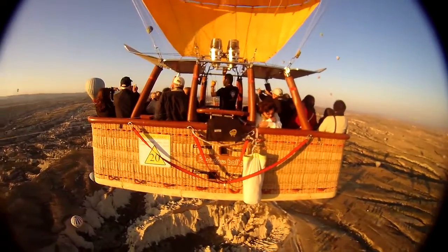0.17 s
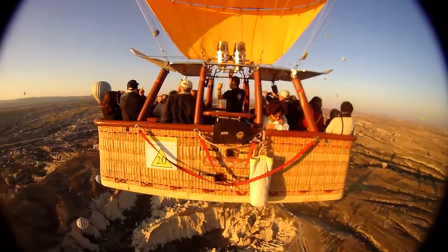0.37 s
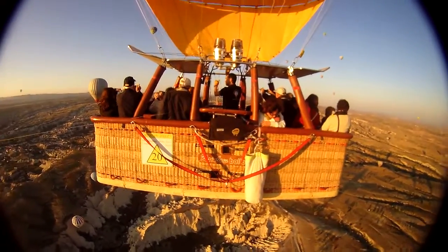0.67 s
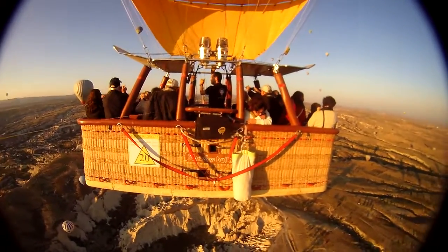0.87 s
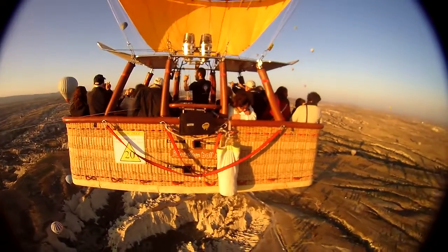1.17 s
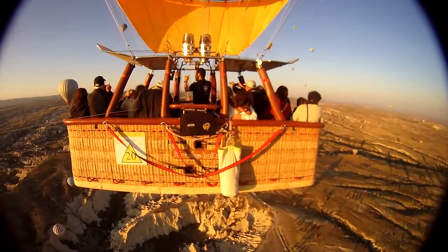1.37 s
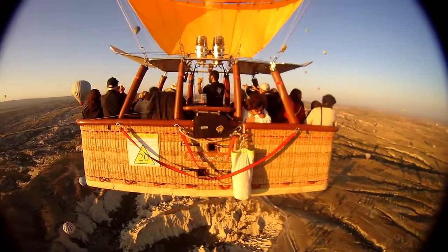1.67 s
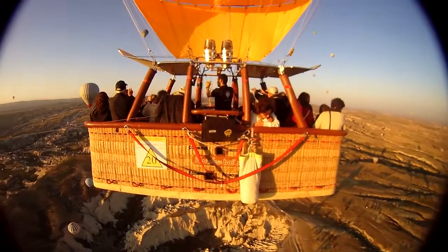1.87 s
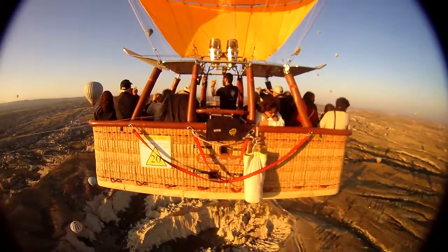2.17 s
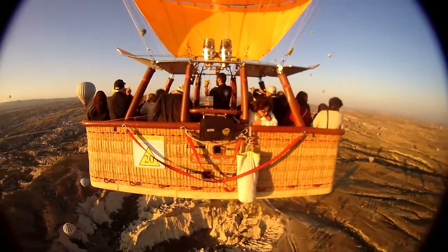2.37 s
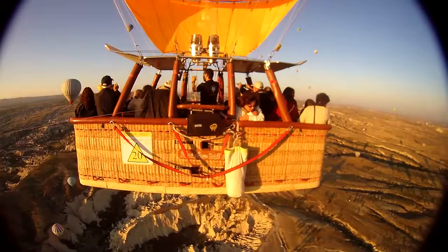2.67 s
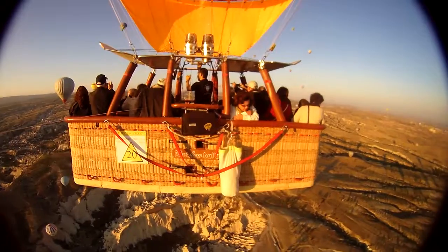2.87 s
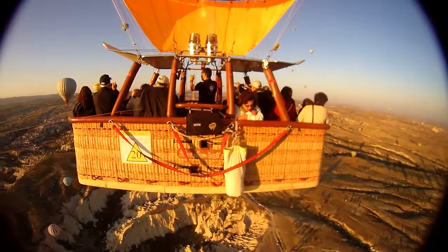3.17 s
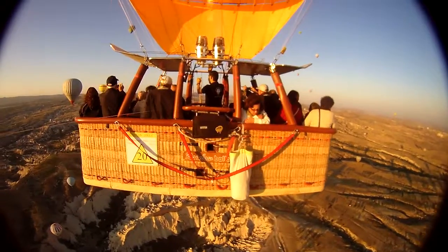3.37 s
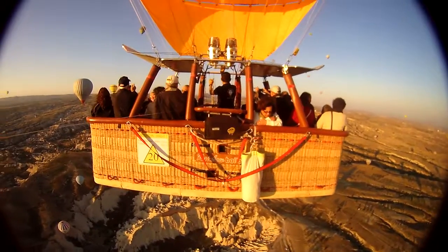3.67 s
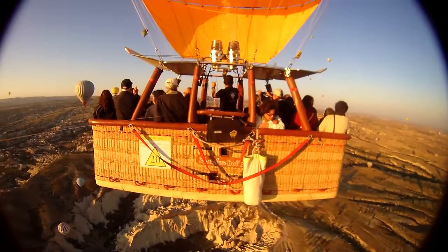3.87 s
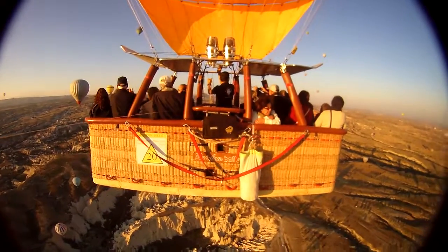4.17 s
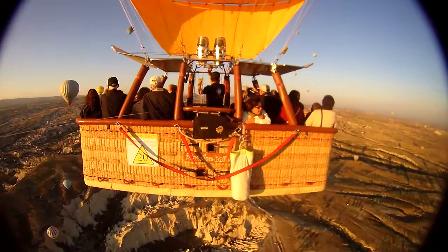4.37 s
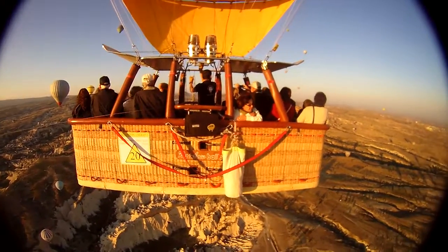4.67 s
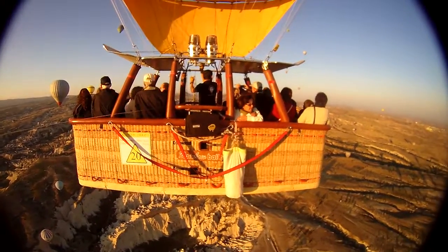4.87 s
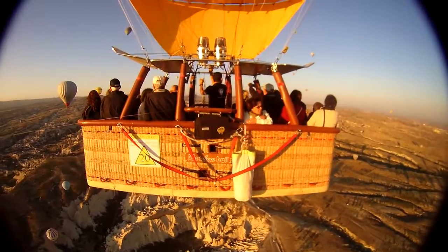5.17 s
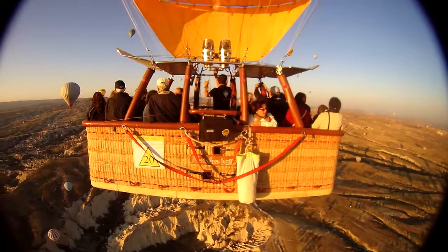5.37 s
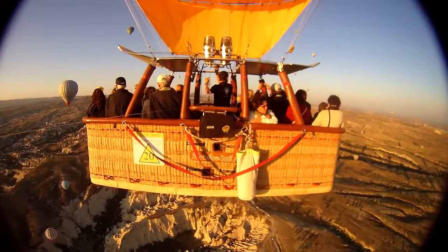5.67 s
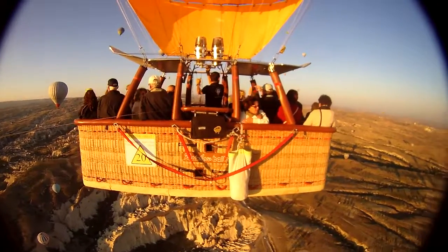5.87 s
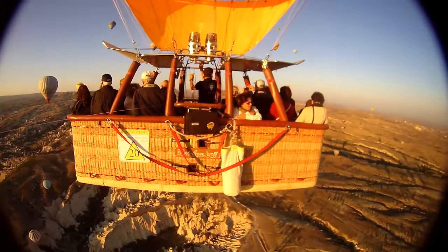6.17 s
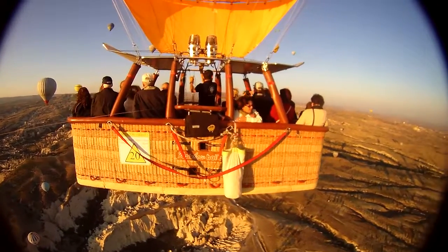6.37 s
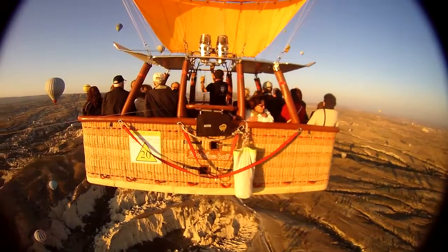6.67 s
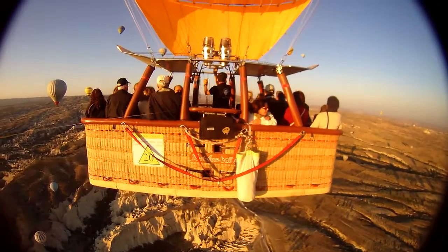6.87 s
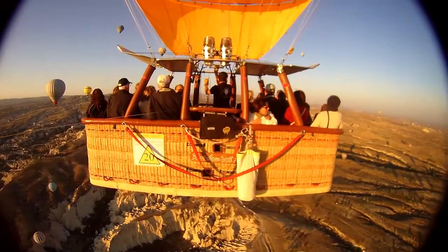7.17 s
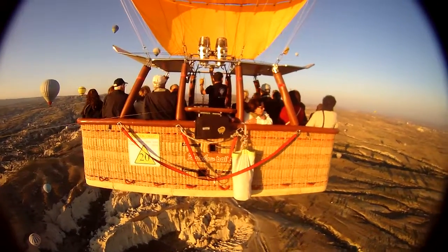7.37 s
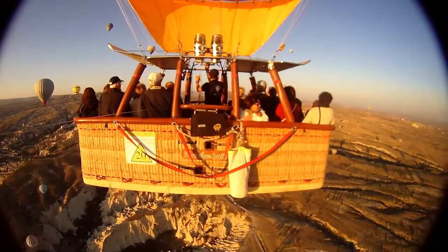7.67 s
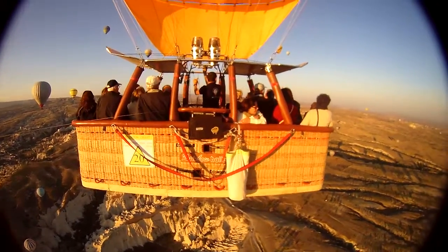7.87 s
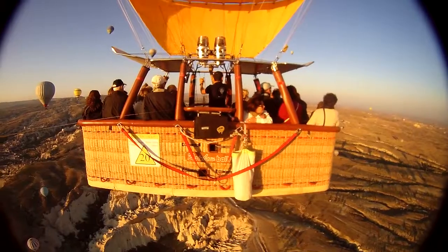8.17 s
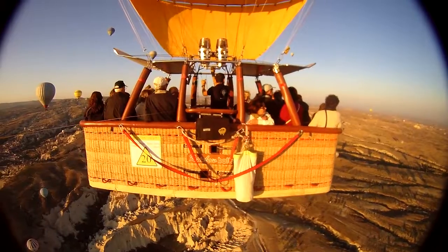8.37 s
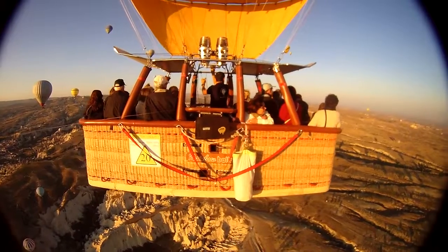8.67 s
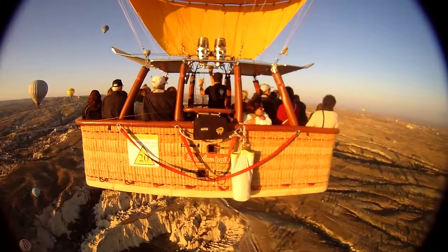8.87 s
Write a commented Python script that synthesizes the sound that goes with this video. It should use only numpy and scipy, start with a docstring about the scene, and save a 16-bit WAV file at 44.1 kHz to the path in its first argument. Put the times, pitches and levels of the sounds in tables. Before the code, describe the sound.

From 0 s a balloon's gas burner is in full blast: dominant deep, fluttering rumble, a rough low-mid roar and a quieter hiss of gas jets with a thin fizz on top. The roar and hiss swell around 0.5 s, the strongest moment, then the big flame slowly settles over several seconds while staying continuous and quickly wavering. Around 4.7 s the hiss sags for under a second as the roar flares slightly; by 5.3 s the flow is back and holds steady. After 7.7 s the hiss thins, the roar gives one short puff at 8.5 s, and near 8.7 s everything collapses within a fraction of a second. A low, soft, constant pilot flame and faint hiss remain to about 9 s. Open air, no echo; single channel, boxy and muffled by a small camera's closed housing.

```python
"""A balloon's gas burner starts with a large flame that settles: rumble and roar over hissing gas jets.
The roar flares early on; near 4.7 s the gas flow sags and recovers while the roar flares again. The flow
then tapers, the roar flares once more and the valve shuts near 8.7 s, leaving the steady pilot flame.
Each part is spectrally shaped noise with slow random level drift, coloured by the resonances of
a small camera's closed housing."""
import sys
import numpy as np
from scipy import signal
from scipy.fft import rfft, irfft, next_fast_len
from scipy.io import wavfile
from scipy.ndimage import uniform_filter1d

SR = 44100
rng = np.random.default_rng(int(sys.argv[2]) if len(sys.argv) > 2 else 0)


def store_wav(level_fs):
    """Save 16-bit WAV to argv[1]."""
    pcm = np.round(np.clip(np.atleast_2d(level_fs), -1, 1) * 32767)
    wavfile.write(sys.argv[1], SR, pcm.T.astype(np.int16))


N = 397251
FULL_FLOW_DB = -60.5  # fizz level that stands for full gas flow
SETTLE_S = 3.84  # time constant of the large early flame


def from_db(db):
    """Amplitude gain is ten to the power of a twentieth of the level in decibels."""
    return 10 ** (np.asarray(db) / 20)


def rms_one(x):
    """Normalisation: dividing by the root mean square gives unit effective value."""
    return x / np.sqrt(np.mean(x ** 2) + 1e-20)


def drift(corner_hz):
    """Low-pass random process: white noise through two equal real poles wanders slowly; rms 1."""
    step = 40  # samples between the points of the drift
    settling = 2000  # points dropped while the filter settles
    pole = np.exp(-2 * np.pi * corner_hz * step / SR)
    noise = rng.standard_normal(N // step + settling + 2)
    slow = signal.lfilter([1], [1, -2 * pole, pole ** 2], noise)[settling:]
    return np.interp(np.arange(N) / step, np.arange(len(slow)), rms_one(slow))


def housing(x):
    """Cavity resonance: second-order sections in cascade boost or absorb narrow bands."""
    # resonances and dips of the housing: (centre frequency [Hz], width [Hz], gain [dB])
    resonances = [(1132, 180, -3.5), (1764, 380, -7.5), (2062, 280, 4.5), (2360, 92, -1.5),
                  (2646, 140, -4.5), (2794, 116, 4.5), (2947, 120, -6), (4060, 215, -11.5),
                  (4370, 230, 1.5), (6180, 300, -8.5), (6800, 530, 4)]
    for hz, width_hz, gain_db in resonances:
        root_gain = from_db(gain_db / 2)
        angle = 2 * np.pi * hz / SR
        half_width = np.pi * width_hz / SR
        zeros = [1 + half_width * root_gain, -2 * np.cos(angle), 1 - half_width * root_gain]
        poles = [1 + half_width / root_gain, -2 * np.cos(angle), 1 - half_width / root_gain]
        x = signal.lfilter(zeros, poles, x)
    return x


def turbulence(spectrum):
    """Broadband turbulent noise: random phases under a smooth spectrum, heard in the housing; rms 1."""
    size = next_fast_len(N)
    hz, level_db = np.transpose(spectrum)
    log_hz = np.log(np.fft.rfftfreq(size, 1 / SR) + 1)  # 1 Hz added to keep the logarithm finite
    shape = from_db(np.interp(log_hz, np.log(hz), level_db))
    noise = irfft(rfft(rng.standard_normal(size)) * shape, size)[:N]
    return rms_one(housing(noise))


def gas_flow_db(t):
    """Quasi-steady jet flow: the level of the jets' fizz stands for the flow that feeds the flame."""
    # gas flow, which sags once and tapers before the valve shuts: (time [s], fizz level [dB])
    flow = [(0, -61.5), (.45, -59), (1.3, -61.5), (2.2, -60.5), (4.0, -60.5), (4.65, -66.5), (5.3, -61),
            (5.8, -60.5), (6.5, -60.5), (7.7, -59.5), (8.1, -63), (8.4, -67), (8.62, -68)]
    at_s, level_db = np.transpose(flow)
    return np.interp(t, at_s, level_db)


def early_flame(t):
    """Exponential relaxation: the excess of the large first flame decays as it settles."""
    return np.exp(-t / SETTLE_S)


def shut_off_db(t, shut_s, fall_db_per_s):
    """Exponential decay: once the valve closes the level falls linearly in decibels."""
    return -fall_db_per_s * np.maximum(t - shut_s, 0)


def rumble(t, eddies):
    """Unsteady heat release: the large flame radiates low noise and follows the gas flow late."""
    # smooth spectrum: (frequency [Hz], level per Hz [dB])
    spectrum = [(8, -12), (20, 7), (45, 8.5), (100, 3.5), (160, -6), (300, -58), (1000, -110)]
    settled_db, early_db = -39, 5.5  # settled flame at full flow; extra at first
    follows, lag_s = 0.39, 0.085  # share of the flow's swing in dB; delay of the tall flame
    level_db = settled_db + early_db * early_flame(t)
    level_db = level_db + follows * (gas_flow_db(t - lag_s) - FULL_FLOW_DB)
    level_db = level_db + shut_off_db(t, 8.72, 140)
    flicker_db = 1.36 * eddies + 0.41 * drift(7.8)
    return from_db(level_db + flicker_db) * turbulence(spectrum)


def roar(t, eddies):
    """Combustion roar: turbulent burning radiates mid-band noise, with brief swells of level."""
    # smooth spectrum: (frequency [Hz], level per Hz [dB])
    spectrum = [(50, -36), (100, -3), (170, -1), (280, -5), (480, -14), (900, -16.5), (1500, -21.5),
                (2200, -32), (5000, -100)]
    # flare-ups of the roar, bell-shaped in dB: (centre time [s], half width at 1/e [s], rise [dB])
    flares = [(.55, .28, 2.5), (4.8, 0.22, 2.5), (8.5, 0.11, 3)]
    settled_db, early_db = -40.5, 3.5  # settled flame; extra at first
    flares_db = sum(rise_db * np.exp(-((t - at_s) / width_s) ** 2) for at_s, width_s, rise_db in flares)
    level_db = settled_db + early_db * early_flame(t) + flares_db
    level_db = level_db + shut_off_db(t, 8.705, 209)
    flicker_db = 0.48 * eddies + 0.17 * drift(26.0)
    return from_db(level_db + flicker_db) * turbulence(spectrum)


def jets(t, eddies):
    """Jet noise: gas mixing with air at the nozzles hisses, following part of the flow's swing."""
    # smooth spectrum: (frequency [Hz], level per Hz [dB])
    spectrum = [(700, -29), (1400, -7), (2000, -1.5), (2500, 1), (3000, -7.5), (3800, -30), (7000, -80)]
    full_db, follows = -49, 0.73  # hiss at full flow; share of the flow's swing in dB
    level_db = full_db + follows * (gas_flow_db(t) - FULL_FLOW_DB)
    level_db = level_db + shut_off_db(t, 8.7, 170)
    flicker_db = 0.15 * eddies + 0.43 * drift(19.0)
    return from_db(level_db + flicker_db) * turbulence(spectrum)


def fizz(t, eddies):
    """Fine-scale jet noise: the highest hiss tracks the gas flow fully and starts to die first."""
    # smooth spectrum: (frequency [Hz], level per Hz [dB])
    spectrum = [(2000, -22), (2800, -2), (3300, -0.5), (4400, -8.5), (5500, -21.5), (7000, -25.5),
                (9200, -27), (11000, -36), (16000, -40)]
    level_db = gas_flow_db(t) + shut_off_db(t, 8.62, 110)
    flicker_db = 0.32 * eddies + 0.47 * drift(12.0)
    return from_db(level_db + flicker_db) * turbulence(spectrum)


def burner():
    """Common modulation: large eddies make flame and jets waver together over their own flicker."""
    t = np.arange(N) / SR
    eddies = drift(14.4)
    return rumble(t, eddies) + roar(t, eddies) + jets(t, eddies) + fizz(t, eddies)


def pilot_flame():
    """Stationary combustion noise: a small flame sounds at a constant level throughout."""
    # smooth spectrum: (frequency [Hz], level per Hz [dB])
    spectrum = [(10, -1), (40, 4), (220, -9.5), (420, -20), (1000, -28.5), (1500, -20), (2700, -26.5),
                (3300, -43), (6000, -70)]
    return from_db(-55.5) * turbulence(spectrum)


def scene():
    """Superposition: the pressures of the blast and the pilot flame add, in one channel."""
    return (burner() + pilot_flame())[None]


def record(dry):
    """Quadratic distortion, additive preamplifier hiss and a steep low-pass filter, in that order."""
    lopsided = 0.74  # per unit of pressure: compressions come out taller than rarefactions
    hiss_db, cutoff_hz = -79.5, 15720  # hiss level ahead of the low-pass; its stop-band edge
    squared = dry ** 2
    # subtracting the local mean removes the offset that squaring adds
    wet = dry + lopsided * (squared - uniform_filter1d(squared, size=4001))
    wet = wet + from_db(hiss_db) * rng.standard_normal(dry.shape)
    low_pass = signal.cheby2(30, 40, cutoff_hz, fs=SR, output="sos")
    return signal.sosfilt(low_pass, wet)


dry = scene()
out = record(dry)
store_wav(out)
```